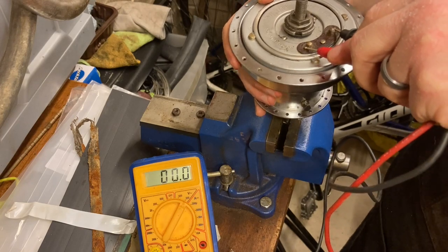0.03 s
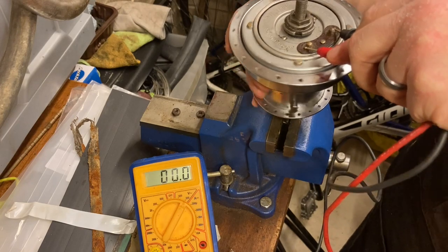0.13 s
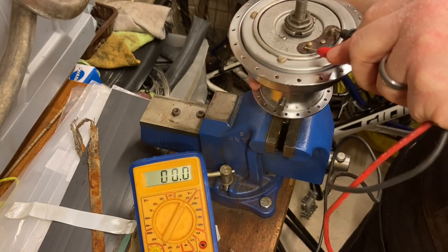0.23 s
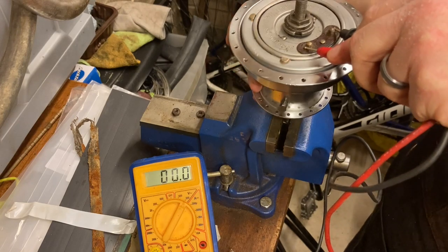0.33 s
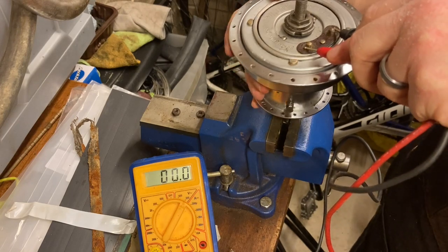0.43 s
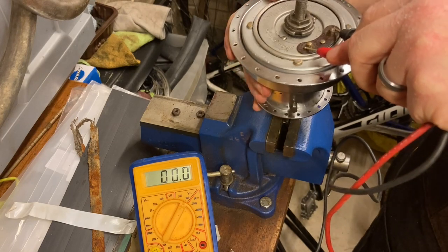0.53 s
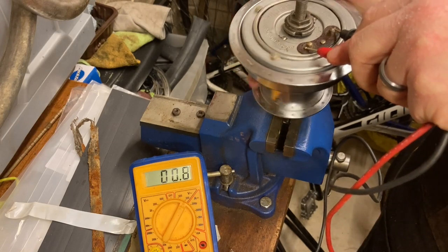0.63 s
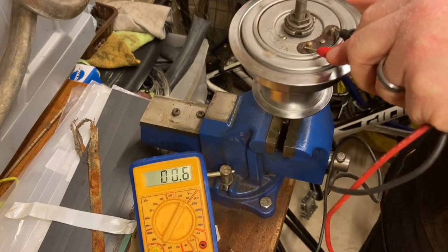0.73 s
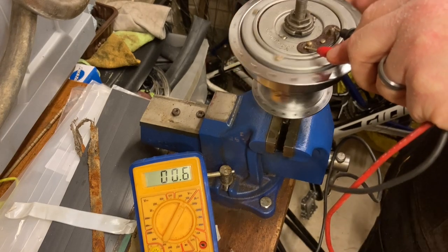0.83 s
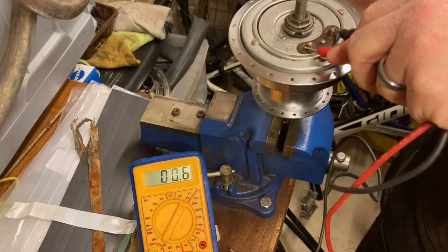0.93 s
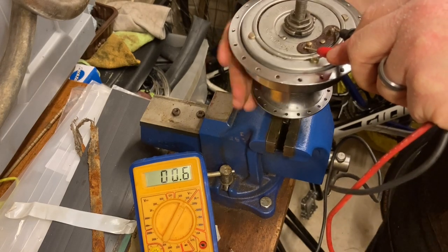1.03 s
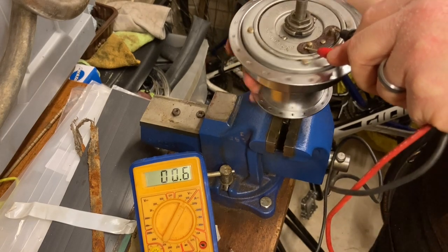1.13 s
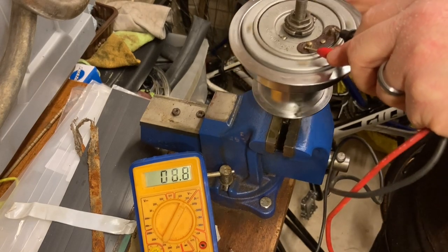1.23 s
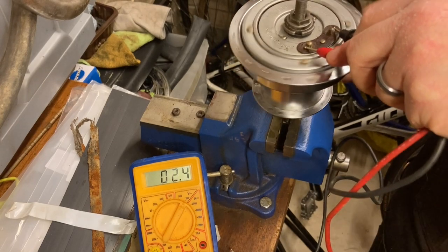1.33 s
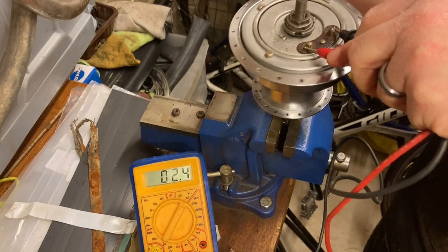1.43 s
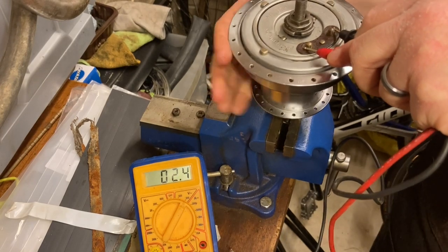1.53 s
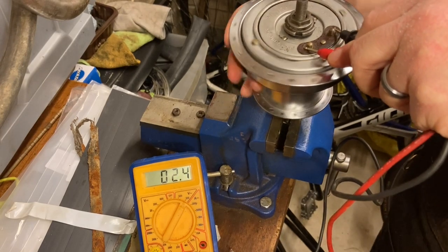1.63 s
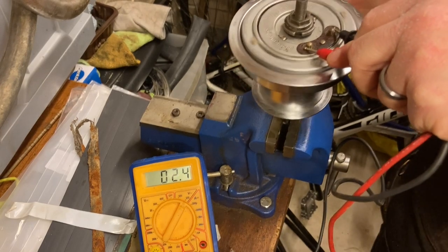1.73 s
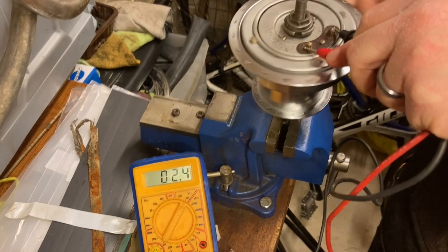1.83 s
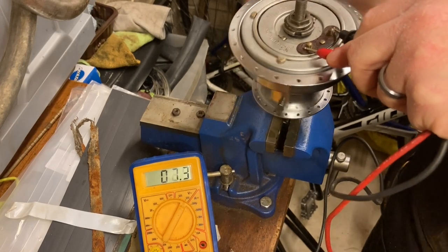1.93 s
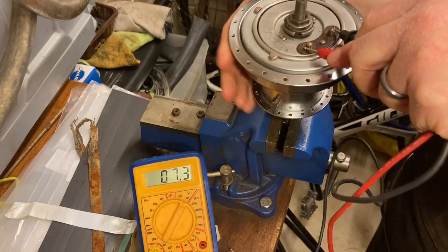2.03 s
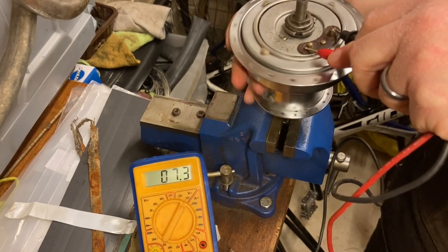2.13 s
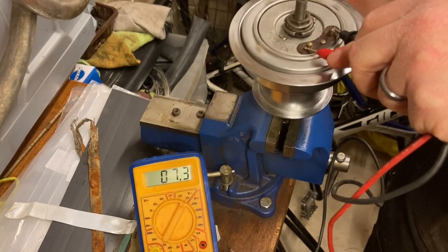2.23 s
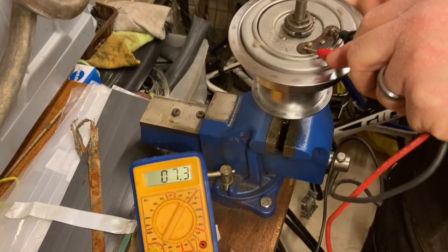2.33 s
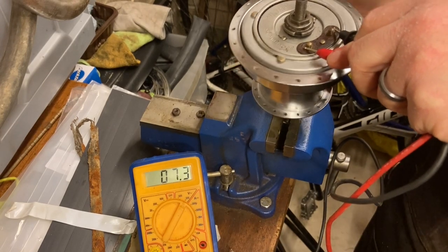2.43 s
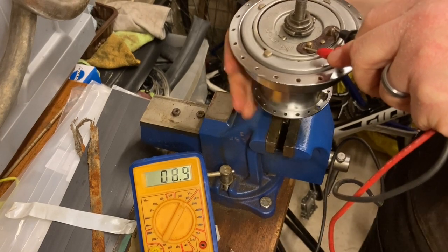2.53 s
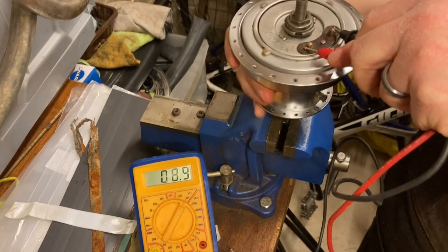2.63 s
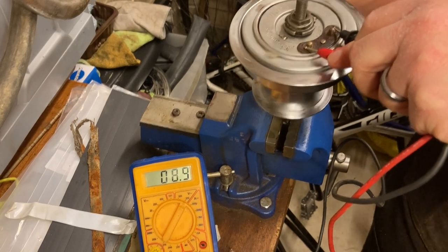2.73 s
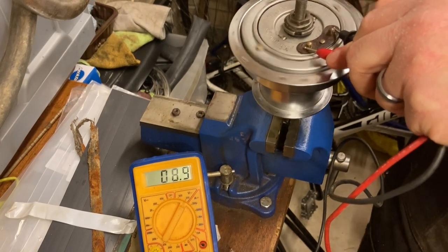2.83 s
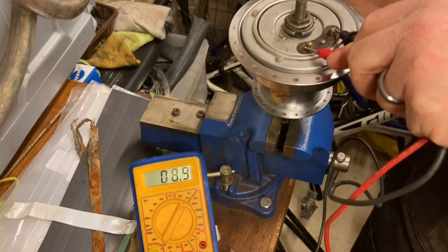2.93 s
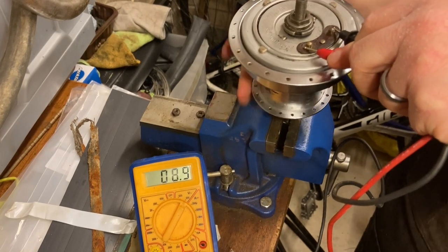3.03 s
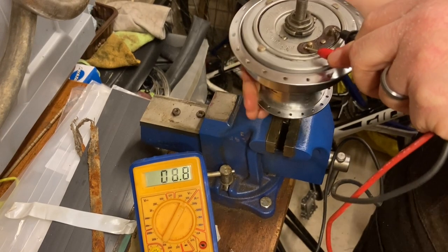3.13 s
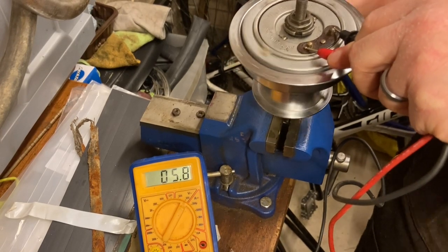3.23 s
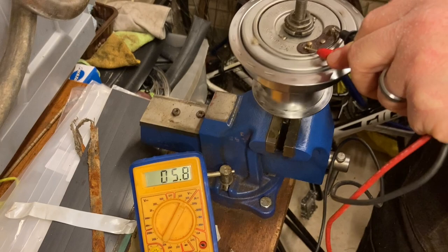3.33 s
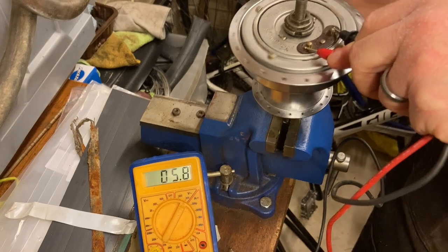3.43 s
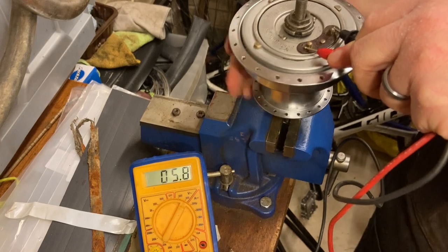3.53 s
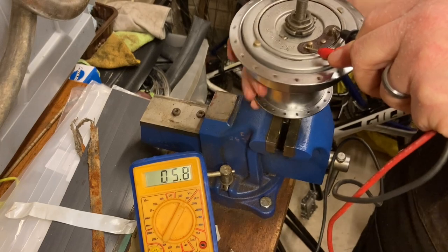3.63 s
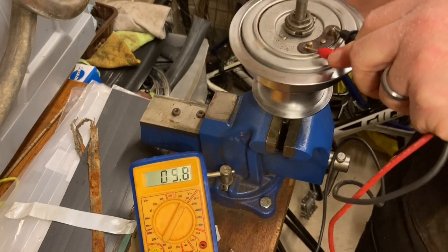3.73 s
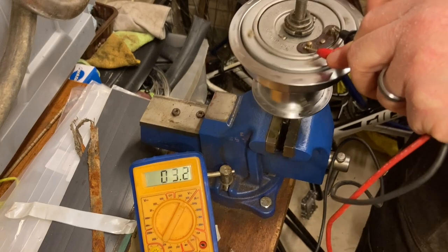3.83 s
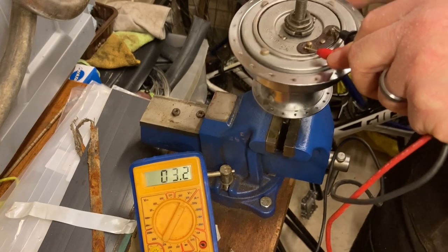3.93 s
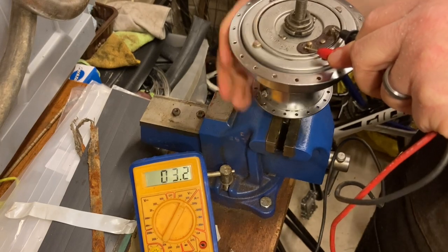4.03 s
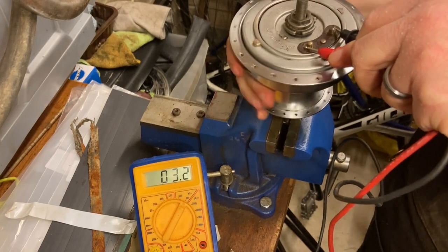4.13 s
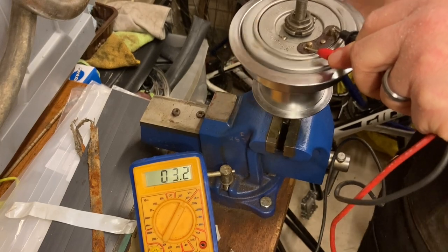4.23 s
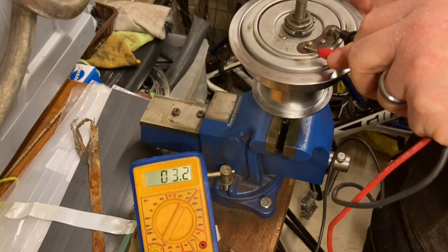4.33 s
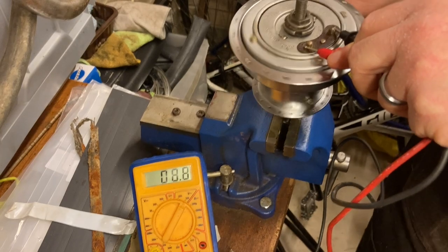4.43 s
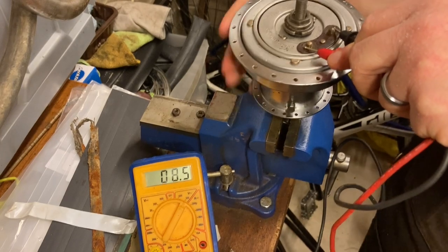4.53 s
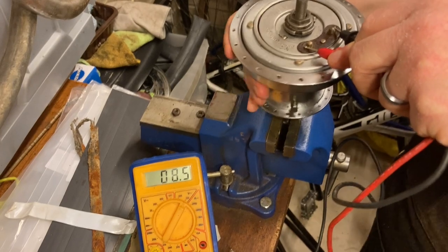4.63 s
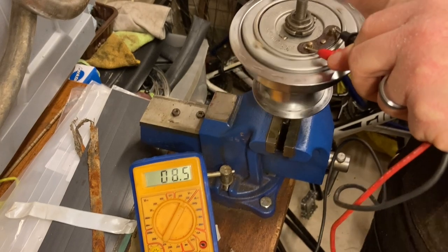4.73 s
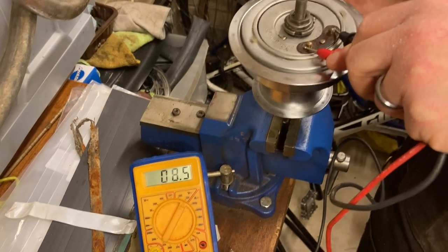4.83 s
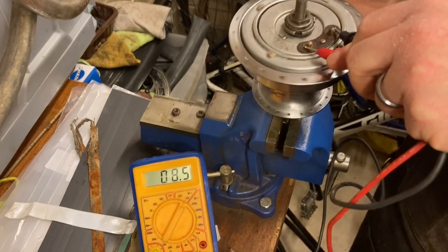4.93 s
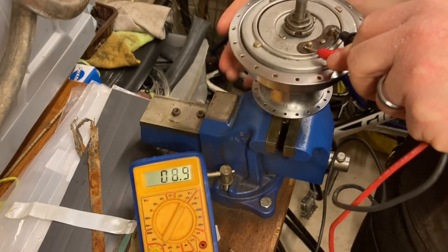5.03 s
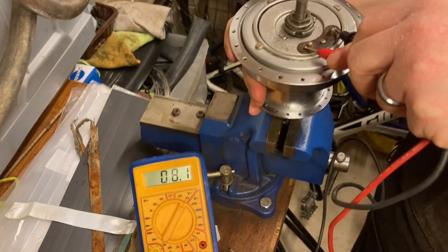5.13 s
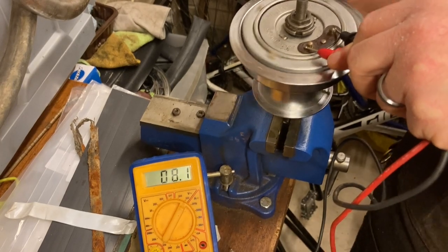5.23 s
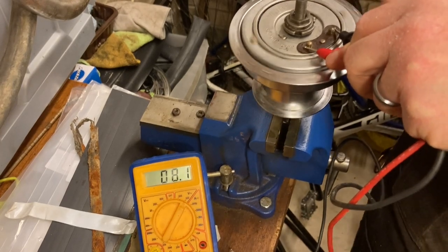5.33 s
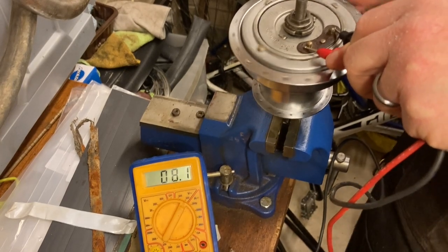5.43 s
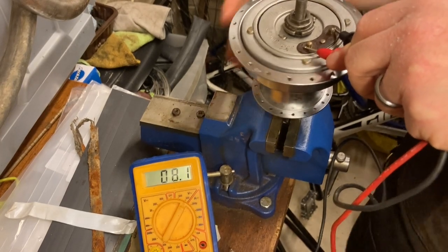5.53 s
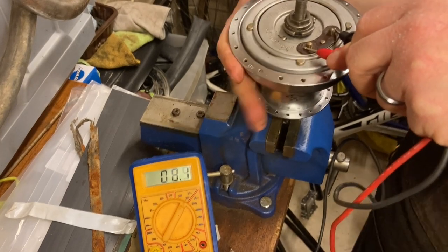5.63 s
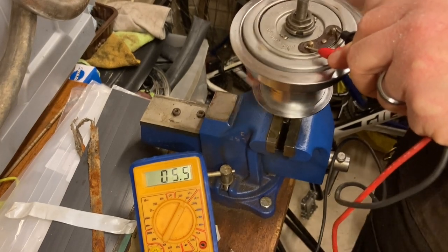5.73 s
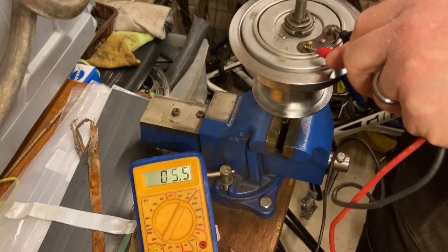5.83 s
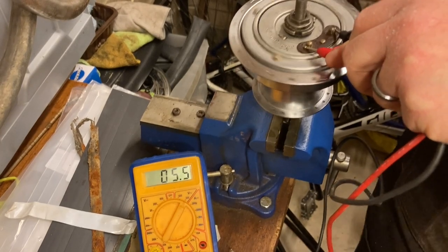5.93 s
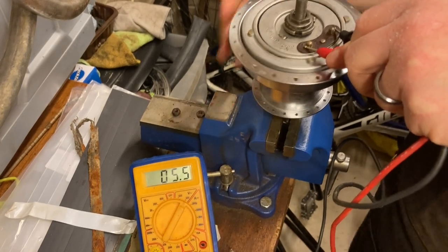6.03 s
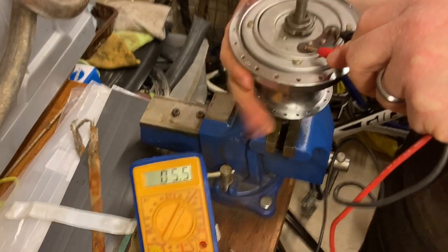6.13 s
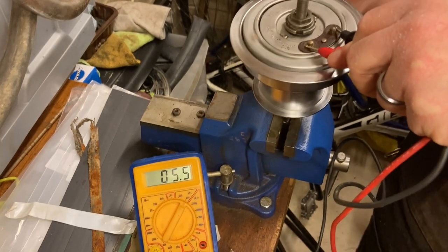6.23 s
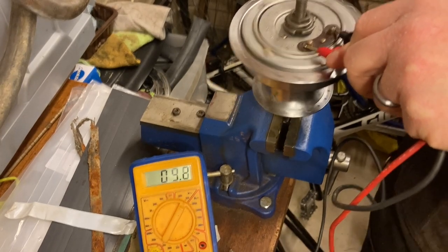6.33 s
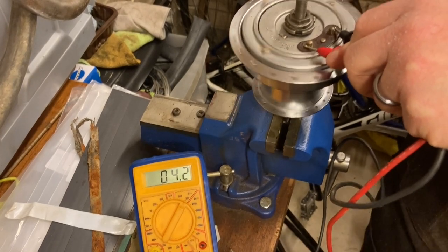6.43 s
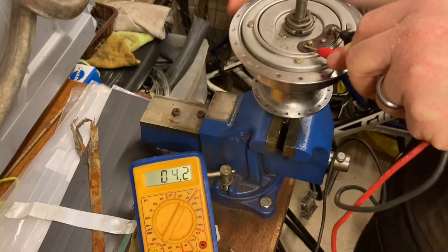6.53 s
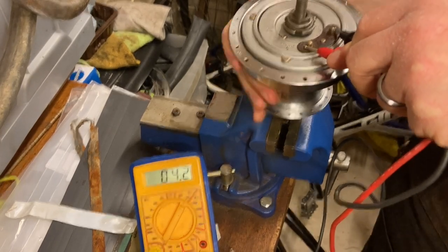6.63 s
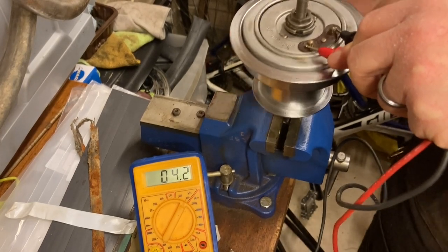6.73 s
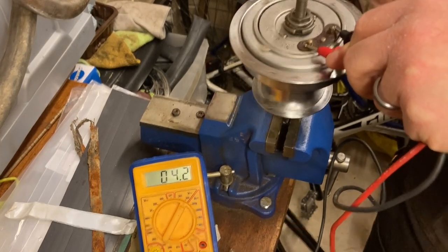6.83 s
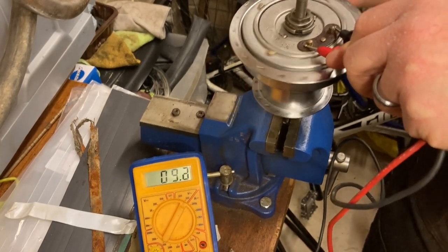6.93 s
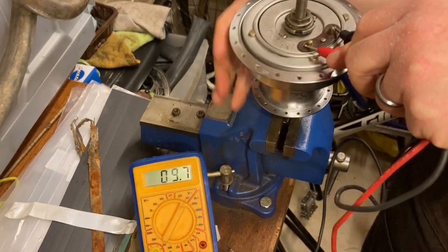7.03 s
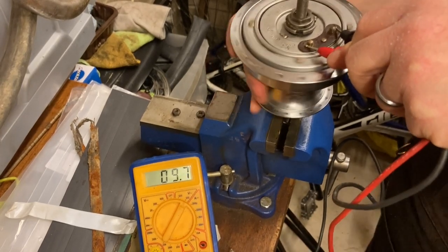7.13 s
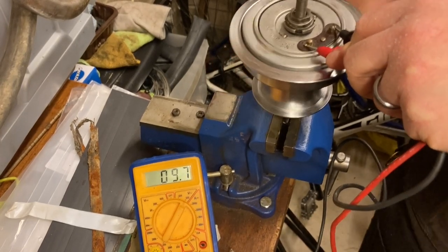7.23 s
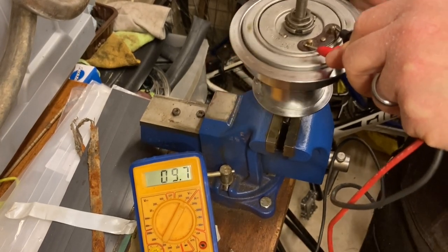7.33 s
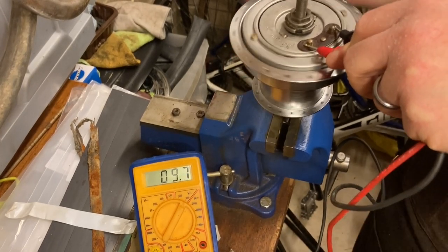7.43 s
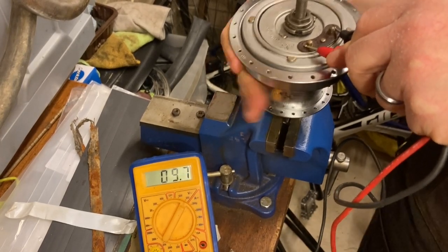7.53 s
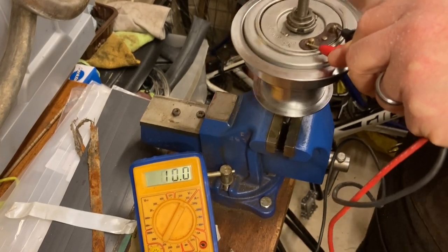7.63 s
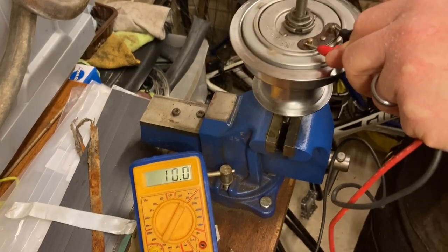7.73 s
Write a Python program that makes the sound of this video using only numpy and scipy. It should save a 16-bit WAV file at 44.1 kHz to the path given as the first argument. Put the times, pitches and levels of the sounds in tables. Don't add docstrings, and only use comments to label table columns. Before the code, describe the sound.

A metal bicycle hub clamped in a bench vice is flicked round by hand twice a second, whirring and rumbling with finger rubs and ticks.

```python
import sys
import numpy as np
from scipy import signal
from scipy.fft import rfft, irfft, next_fast_len
from scipy.io import wavfile
from scipy.ndimage import uniform_filter1d

SR = 44100
rng = np.random.default_rng(int(sys.argv[2]) if len(sys.argv) > 2 else 0)


def store_pcm(level_fs):
    pcm = np.round(np.clip(level_fs, -1, 1) * 32767).astype(np.int16)
    wavfile.write(sys.argv[1], SR, np.atleast_2d(pcm).T)


def invert_db(x):
    u = np.asarray(x, float) / 20
    return 10 ** u


N = 343539
TIME = np.arange(N) / SR
STEPS = np.arange(0, N + 64, 64) / SR
SIZE = next_fast_len(N + SR // 2)
HZ = np.fft.rfftfreq(SIZE, 1 / SR)
BINS = np.fft.rfftfreq(512, 1 / SR)


def evened(x):
    return x / np.sqrt(np.mean(x ** 2) + 1e-20)


def read(points, hz):
    f, value = np.transpose(points)
    return np.interp(np.log(hz + 1), np.log(f + 1), value)


def fine(control):
    return np.interp(TIME, STEPS, control)


def summed(rows_db):
    return 10 * np.log10(sum(invert_db(2 * np.maximum(db, -150)) for db in rows_db))


def wander(rate_hz):
    lowpass = signal.butter(2, rate_hz, fs=SR, output="sos")
    return evened(signal.sosfilt(lowpass, rng.standard_normal(N)))


def add(mix, s, sound):
    part = mix[:, round(s * SR):][:, :sound.shape[-1]]
    part += sound[..., :part.shape[1]]


def ring(x, modes):
    body = 0
    for k, (f, width, db) in enumerate(modes):
        damping = 1j * HZ * width
        body = body + (-1) ** k * invert_db(db) * damping / (f ** 2 - HZ ** 2 + damping)
    body = body / np.sqrt(np.mean(abs(body) ** 2))
    return irfft(rfft(x, SIZE) * body, SIZE)[..., :N]


def burst(hz, sharp, t60):
    t = np.arange(3000) / SR
    b, a = signal.iirpeak(min(hz, 15000), sharp, fs=SR)
    puff = signal.lfilter(b, a, rng.standard_normal((2, len(t))))
    puff = evened(signal.lfilter(b, a, puff))
    return puff * invert_db(-60 * t / t60) * np.minimum(t / 0.0006, 1)


# (frequency [Hz], density [dB per Hz])
SHED_AIR = [(40, -1.5), (120, -10), (300, -20.5), (700, -34), (1500, -33.5), (4000, -35.5), (9000, -37.5),
            (16000, -39)]


def shed():
    noise = rng.standard_normal((2, N))
    air = irfft(rfft(noise, SIZE) * invert_db(read(SHED_AIR, HZ)), SIZE)[:, :N]
    return invert_db(-63.5 + 0.4 * wander(6.6)) * evened(air)


# (time [s], peak level [dB], pitch [Hz], ring time [s])
VICE_KNOCKS = [
    (0.415, -58, 116, 0.19),
    (2.595, -35, 190, 0.041),
    (4.629, -47, 224, 0.1),
    (7.504, -37.5, 100.9, 0.071),
]


def knocks():
    out, t = np.zeros((2, N)), np.arange(5000) / SR
    for s, db, hz, t60 in VICE_KNOCKS:
        envelope = invert_db(db - 60 * t / t60) * np.minimum(t / 0.0069, 1)
        add(out, s, 1.94 * envelope * np.sin(2 * np.pi * hz * t))
    return out


def slowing(top, run_up, coast):
    t = STEPS - top
    early, late = np.maximum(-t / run_up, 0), np.maximum(t / coast, 0)
    return -20 * early ** 2.2 - 30 * late ** 1.5


# (time of top speed [s], shell level [dB], run-up [s], coast [s], bench over shell [dB])
HUB_FLICKS = [(.21, -72.5, .1, 0.1, 2), (.76, -44.5, .1, 0.22, 4), (1.29, -45, .1, 0.2, 3.5),
              (1.78, -45.5, .12, .22, 4.5), (2.28, -43, .09, 0.24, 5), (2.80, -43.5, .1, .25, 5),
              (3.319, -43, .12, 0.22, 4.5), (3.80, -42, .1, 0.22, 3), (4.31, -42.5, .12, 0.25, 4),
              (4.82, -46, .11, 0.24, 6), (5.32, -42.5, .11, .25, 4.5), (5.84, -39, .1, 0.26, 3),
              (6.305, -38.5, 0.068, 0.29, 3), (6.805, -40.5, .08, .27, 4), (7.30, -39, .11, 0.23, 4),
              (7.73, -37, .08, 0.28, -0.5)]


def spin():
    bench_share, bench_late_s = 0.74, 0.012
    shell, bench = [], []
    for s, db, run_up, coast, over_db in HUB_FLICKS:
        shell.append(db + slowing(s, run_up, coast))
        bench.append(db + over_db + bench_share * slowing(s + bench_late_s, run_up, coast))
    drops = [slowing(s, run_up, coast) for s, _, run_up, coast, _ in HUB_FLICKS[1:]]
    return summed(shell), summed(bench), np.minimum(summed(drops), 0)


# (time fingers land [s], contact [s], level [dB])
FINGER_RUBS = [(.12, 0.21, -66), (.4, 0.054, -78), (0.628, 0.2, -56.5), (1.151, 0.32, -57.5),
               (1.63, 0.3, -59.5), (2.091, 0.37, -58), (2.6, 0.316, -57.5), (2.93, 0.33, -54),
               (3.23, 0.22, -63), (3.671, .29, -57), (4.14, 0.3, -56), (4.6, 0.23, -55.5),
               (5.099, 0.33, -56.5), (5.69, 0.35, -52), (6.142, 0.32, -53), (6.55, 0.44, -56),
               (7.098, .32, -53), (7.531, 0.37, -52)]


def rubbing(drop_db):
    land_s, lift_db, lift_s, fade_db_per_s = 0.025, 7, 0.016, 36
    rows = []
    for s, held, db in FINGER_RUBS:
        before = np.maximum(1 + (s - STEPS) / land_s, 0)
        after = np.maximum(STEPS - s - held, 0)
        lifted_db = lift_db * (1 - np.exp(-after / lift_s)) + fade_db_per_s * after
        rows.append(db - 30 * before - lifted_db)
    return summed(rows) + np.maximum(0.4 * drop_db, -7.5)


# (time [s], peak level [dB], width [s])
BENCH_GRIPS = [(.43, -58, 0.046), (.725, -46, 0.025), (1.145, -45.5, 0.012), (1.238, -47, 0.027),
               (1.64, -48.5, .05), (1.93, -49, 0.085), (2.163, -51.5, 0.018), (2.365, -42, 0.024),
               (2.649, -38.5, 0.032), (2.995, -49.5, 0.061), (3.14, -53, 0.029), (3.456, -42, 0.023),
               (3.934, -50, 0.066), (4.176, -42.5, 0.022), (4.37, -51, 0.036), (4.658, -40.5, 0.019),
               (5.005, -41, 0.014), (5.219, -44.5, .04), (5.376, -44, 0.035), (5.566, -42.5, 0.014),
               (5.714, -38, 0.031), (5.977, -41, 0.029), (6.206, -32.5, 0.029), (6.701, -37.5, 0.031),
               (6.95, -44, 0.029), (7.051, -45, 0.015), (7.174, -28.5, 0.033), (7.576, -49, 0.033),
               (7.626, -33, 0.022), (7.721, -43, .03)]


def sway():
    bench_db = spin()[1]
    rocking = invert_db(-42.5 + 0.53 * (bench_db + 42.5))
    lurch = sum(invert_db(db + 3.5) * np.exp(-((STEPS - s) / width) ** 2) for s, db, width in BENCH_GRIPS)
    uneven = fine(rocking) * np.tanh(0.87 * wander(11))
    reach = np.sqrt(fine(lurch) ** 2 + uneven ** 2)
    pitch_hz = 55 * (1 + 0.0984 * wander(20.7))
    return reach * np.sin(2 * np.pi * np.cumsum(pitch_hz) / SR)


# (time [s], peak level [dB], centre [Hz])
PAD_TAPS = [(0.141, -54.5, 780), (0.315, -78, 1360), (0.624, -50, 1040), (0.654, -36, 790),
            (1.194, -49, 791.7), (1.583, -48.5, 830), (1.636, -37, 840), (1.729, -35.5, 797.6),
            (2.095, -49.5, 1280), (2.217, -42.5, 746), (2.617, -42, 821.6), (3.294, -53, 809.8),
            (3.674, -49.5, 774), (4.11, -51.5, 1420), (4.206, -43.5, 782.6), (4.625, -38, 960),
            (5.196, -48, 2300), (5.23, -44, 796), (5.39, -35, 762.5), (5.674, -43, 1050), (6.255, -40, 848),
            (6.499, -41, 739.5), (6.728, -58, 1310), (7.2, -33, 1365), (7.489, -45.5, 1340),
            (7.685, -35, 768)]
# (time [s], peak level [dB], centre [Hz])
FLANGE_PINGS = [(0.2628, -58, 4700), (0.625, -51, 4870), (1.2939, -30, 4820), (1.427, -48.5, 3850),
                (1.634, -46, 4440), (1.866, -47, 2580), (2.0934, -50.5, 4665), (2.146, -46, 4570),
                (2.4777, -42, 3740), (3.297, -42, 4420), (3.4507, -44, 3930), (3.739, -47, 4280),
                (4.206, -42, 3740), (4.4307, -46.5, 4670), (5.2323, -44.5, 3970), (5.3317, -41.5, 4770),
                (5.434, -40.5, 3860), (6.4739, -48, 4710), (6.4969, -44.5, 2523), (6.955, -42.5, 3860),
                (7.31, -59, 4110), (7.375, -42, 3880), (7.534, -46.5, 3870), (7.6114, -46, 4250)]
# (time [s], peak level [dB])
NAIL_TICKS = [(0.14, -56.5), (0.3007, -53), (0.315, -46.5), (0.655, -40.5), (0.6904, -36), (1.1943, -48),
              (1.2448, -35), (1.466, -50), (1.6801, -51), (1.6996, -46), (2.217, -42), (2.6108, -48),
              (2.7203, -55), (2.8853, -45), (4.145, -48.5), (4.6702, -47.5), (4.716, -44), (4.7596, -37),
              (5.177, -52), (5.7782, -32.5), (6.0374, -52), (6.1462, -41), (6.2531, -58), (6.5568, -42),
              (6.6598, -41.5), (7.1242, -42), (7.5775, -44)]
# (time [s], peak level [dB])
NAIL_SNAGS = [(1.152, -47), (2.667, -52), (2.7524, -42), (3.0465, -45.5), (3.1855, -36.5), (3.674, -40),
              (3.8575, -47), (4.4098, -41), (4.6314, -49), (5.1967, -44.5), (5.7124, -42.5), (5.7582, -39),
              (6.3126, -32), (7.7214, -35.5)]


def fingers():
    out, ahead_s = np.zeros((2, N)), 0.001
    ticks = list(FLANGE_PINGS)
    for events, centre_hz in [(NAIL_TICKS, 8260), (NAIL_SNAGS, 11220)]:
        ticks += [(s, db, centre_hz * (1 + 0.043 * rng.standard_normal())) for s, db in events]
    for s, db, hz in ticks:
        ping = burst(hz, 16, 0.04) + 0.22 * burst(9000, 0.73, 0.045)
        add(out, s - ahead_s, invert_db(db - 6.5) * ping)
        add(out, s - ahead_s, invert_db(db - 7) * burst(6000, 0.45, 0.014))
    for s, db, hz in PAD_TAPS:
        thud = burst(hz, 1.16, 0.1) + burst(1440, 0.58, 0.16)
        add(out, s - ahead_s, invert_db(db - 15.5) * thud)
    return out


def specks():
    out, hiss_db = np.zeros((2, N)), rubbing(spin()[2])
    for when, pitch, size in rng.random((130, 3)):
        s = when * N / SR
        db = np.interp(s, STEPS, hiss_db) + 4 - 1.5 * np.log(size + 0.03)
        add(out, s, invert_db(db) * burst(1800 * 7 ** pitch, 9, 0.022))
    return out


def cogging(hum_hz):
    jolts_per_s = hum_hz / 2 * (1 + 0.1 * wander(25.19))
    turns = np.cumsum(jolts_per_s) / SR
    passed = np.diff(np.floor(turns), prepend=0)
    jolts = passed * invert_db(4.2 * wander(95)) * np.sqrt(SR / jolts_per_s)
    hum = np.sin(4 * np.pi * turns) * invert_db(3.4 * wander(44))
    return jolts, hum


def grit(per_s, spread_db):
    size = invert_db(spread_db * np.minimum(rng.exponential(1, N), 5))
    hits = size * (rng.random(N) < per_s / SR)
    x = hits * rng.standard_normal((2, N))
    return x / np.sqrt(uniform_filter1d(x ** 2, SR // 16) + 1e-9)


# (frequency [Hz], width [Hz], level [dB])
BENCH_MODES = [(98.5, 64.4, -0.5), (130.8, 35.5, 4), (153.3, 15.8, 2), (231.9, 13.3, 1),
               (299.1, 18.7, -4.5), (339, 20, -4.5), (437, 33, -5), (492.5, 12.5, -5.5), (544, 38, -10.5)]
# (frequency [Hz], width [Hz], level [dB])
SHELL_MODES = [(650, 45, -9), (746, 9.8, 1), (793.7, 17, 2.5), (848, 49, -1.5), (1036, 27.6, -3.5),
               (1167, 19, -11.5), (1266, 76, -12), (1439, 104, -11), (2485, 250, -21.5)]
# (frequency [Hz], width [Hz], level [dB])
FLANGE_MODES = [(2160, 960, 4.5), (4560, 450, -6), (4590, 42, 2.5), (7590, 2600, -0.5), (11200, 1600, 7),
                (11350, 4200, 2), (14400, 1400, -8), (15000, 1800, -12.5)]


def hub():
    shell_db, bench_db, drop_db = spin()
    hiss_db = rubbing(drop_db)
    shell_db = fine(summed([shell_db, hiss_db - 10]))
    bench_db = fine(summed([bench_db, hiss_db + 3.5]))
    hum_hz = 97.6 + 99.32 * invert_db(0.55 * drop_db)
    jolts, hum = cogging(fine(hum_hz))
    decay = np.exp(-np.arange(800) / (0.027 * SR))
    shake = evened(signal.oaconvolve(jolts, decay)[:N])

    bench_drive = 0.5 * jolts + 0.86 * grit(900, 2.35)
    bench = ring(invert_db(bench_db) * bench_drive, BENCH_MODES) + invert_db(bench_db - 7.5) * hum
    shell_drive = 0.21 * jolts + (0.49 + 0.17 * shake) * grit(1500, 1.03)
    shell = ring(invert_db(shell_db) * shell_drive, SHELL_MODES)
    flicker = invert_db(1.46 * wander(20.5))
    scrape = grit(9000, 0.59) + 0.28 * grit(160, 1.9)
    hiss_drive = invert_db(fine(hiss_db) + 0.5) * flicker * (0.81 + 0.28 * shake) * scrape
    return invert_db(-5) * bench + invert_db(1.5) * shell + ring(hiss_drive, FLANGE_MODES)


def patches(frames, tall, long):
    field = rng.standard_normal((len(BINS), frames))
    field = uniform_filter1d(field, size=tall, axis=0)
    return evened(uniform_filter1d(field, size=long, axis=1))


# (frequency [Hz], lead [rad])
PORT_LEAD = [(0, -.4), (300, -.35), (800, .3), (1500, 1.2), (2200, 3.0), (3300, 3.2), (4000, 5.0),
             (4600, 6.1), (6250, 3.14), (9800, -3.14), (13050, -9.42), (16000, -14.9)]
# (frequency [Hz], likeness [0-1])
PORT_LIKENESS = [(50, .97), (250, .9), (600, .6), (830, .88), (1500, .78), (2000, .6), (3200, .7),
                 (4700, .88), (5400, .6), (6300, .82), (8000, .98), (15000, .975)]
# (frequency [Hz], level [dB])
PORT_TILT = [(60, -.7), (200, .7), (450, -1.5), (800, 4), (1150, -3), (2300, -3), (3500, -.5), (5500, -1.5),
             (9000, 0)]
# (frequency [Hz], drift [rad])
LEAD_DRIFT = [(100, .04), (600, .4), (2000, .8), (3200, .7), (4500, .45), (5400, 1.0), (6500, .35),
              (16000, .2)]


def two_ports(paths):
    first, second = signal.stft(paths, nperseg=512, noverlap=384)[2]
    frames = first.shape[1]
    shade = np.clip(BINS / 500, 0, 1)[:, None]
    colour = invert_db(2.29 * shade * patches(frames, tall=3, long=20))
    same = np.clip(read(PORT_LIKENESS, BINS), 0, 1)[:, None]
    tilt = invert_db(read(PORT_TILT, BINS) / 2)[:, None]
    lead = np.interp(BINS, *np.transpose(PORT_LEAD))[:, None]
    lead = lead + read(LEAD_DRIFT, BINS)[:, None] * patches(frames, tall=9, long=24)
    right = (same * first + 1j * np.sqrt(1 - same ** 2) * second) * np.exp(1j * lead)
    ports = colour * np.array([first * tilt, right / tilt])
    left, right = signal.istft(ports, nperseg=512, noverlap=384)[1][:, :N]
    bass_lead = -0.81 * np.clip(1 - HZ / 110, 0, 1) ** 0.5
    right = irfft(rfft(right, SIZE) * np.exp(1j * bass_lead), SIZE)[:N]
    return np.array([left, right])


def scene():
    return two_ports(shed() + knocks() + sway() + fingers() + specks() + hub())


def band_limit(x):
    return signal.sosfilt(signal.butter(12, 16480, fs=SR, output="sos"), x)


def record(dry):
    low_cut = signal.butter(3, 36, "high", fs=SR, output="sos")
    top_cut = signal.firwin(801, 15800, window=("kaiser", 7), fs=SR)
    heard = signal.sosfilt(low_cut, dry)
    heard = signal.oaconvolve(heard, top_cut[None], "same")
    return band_limit(heard)


dry = scene()
out = record(dry)
store_pcm(out)
```